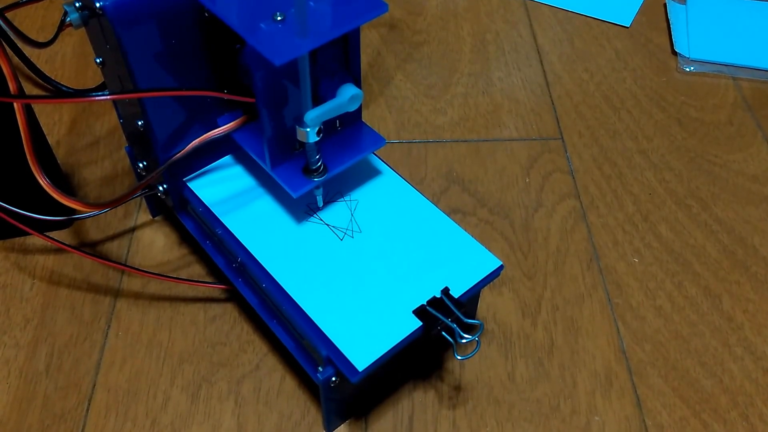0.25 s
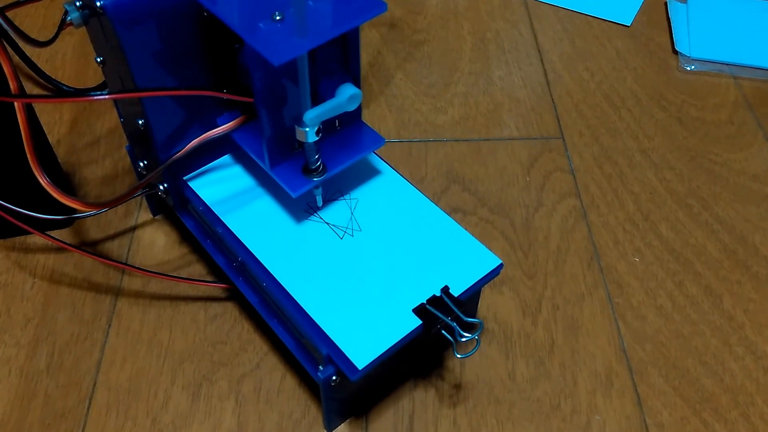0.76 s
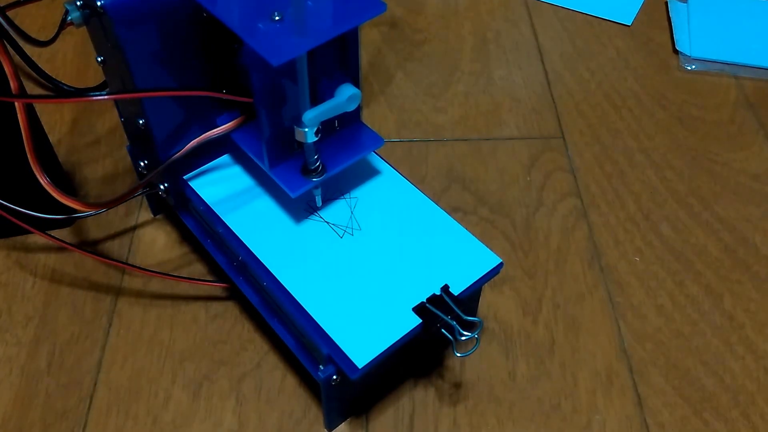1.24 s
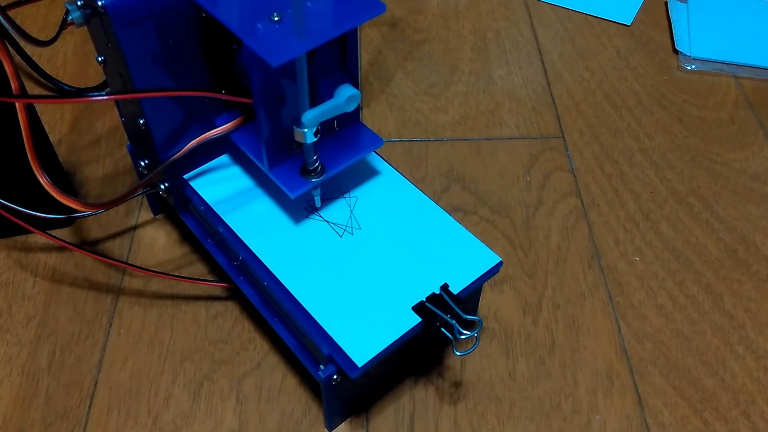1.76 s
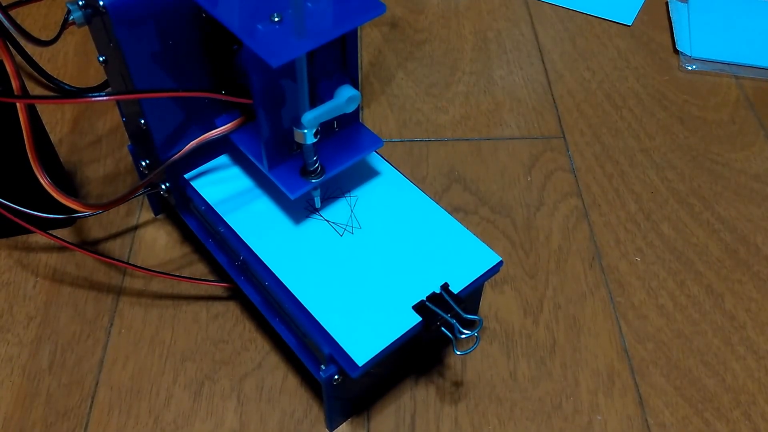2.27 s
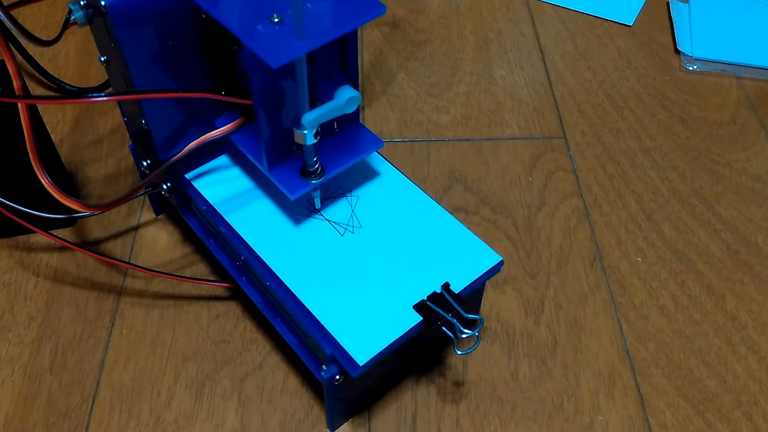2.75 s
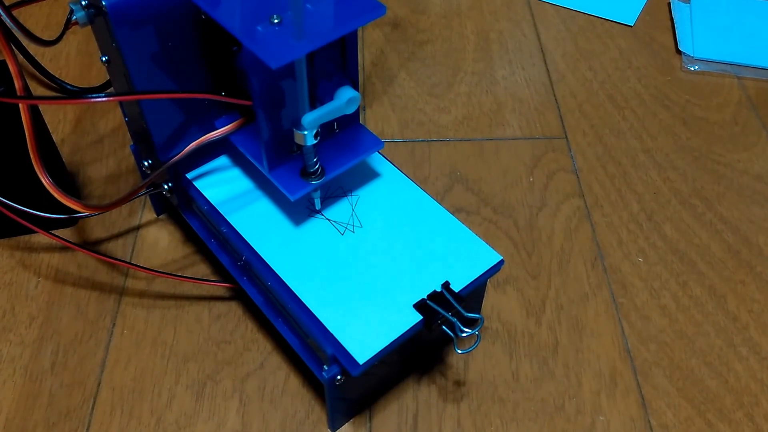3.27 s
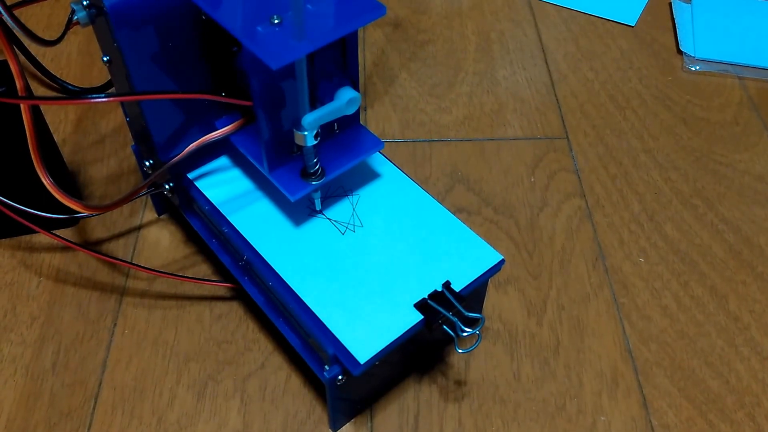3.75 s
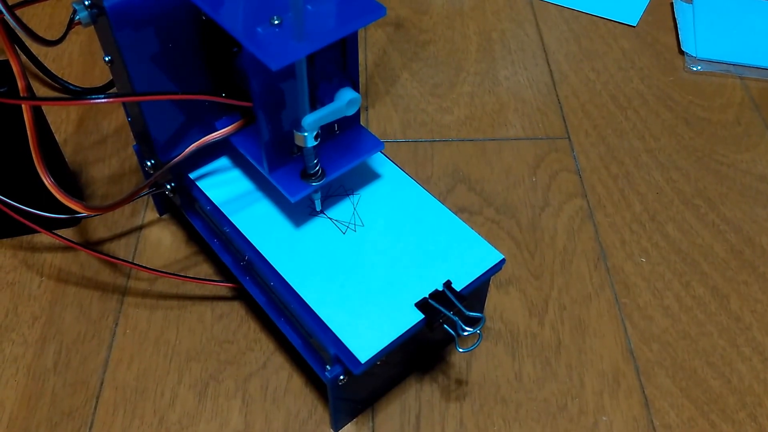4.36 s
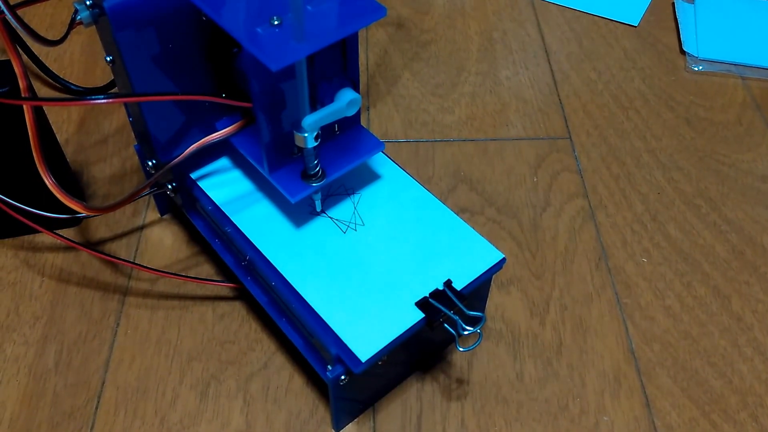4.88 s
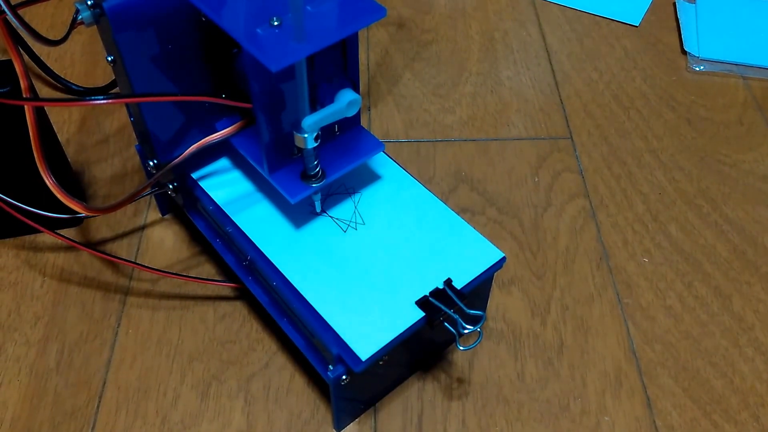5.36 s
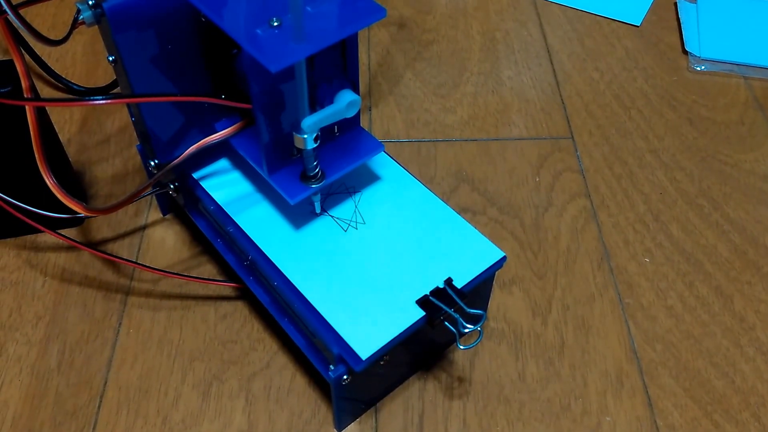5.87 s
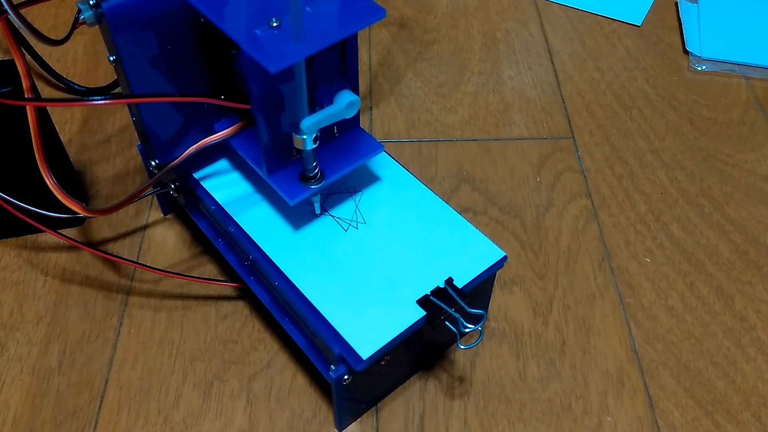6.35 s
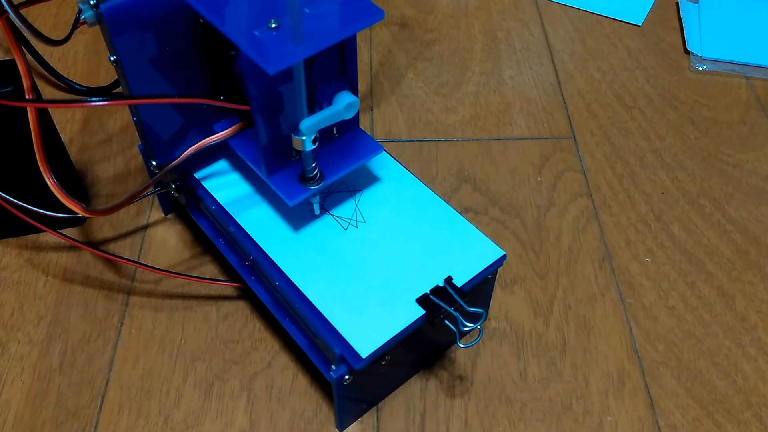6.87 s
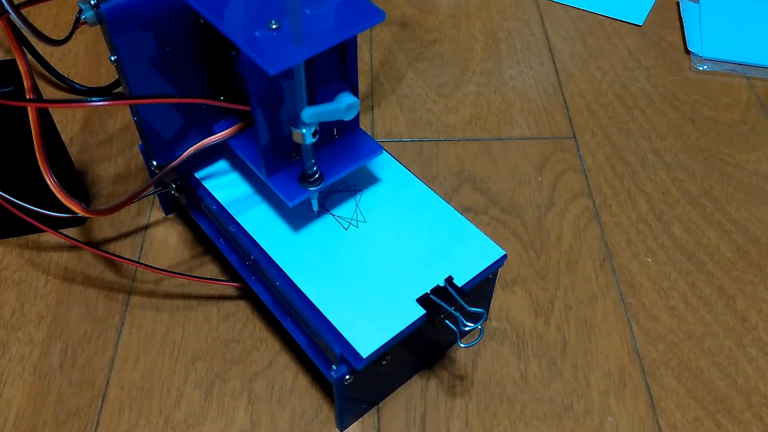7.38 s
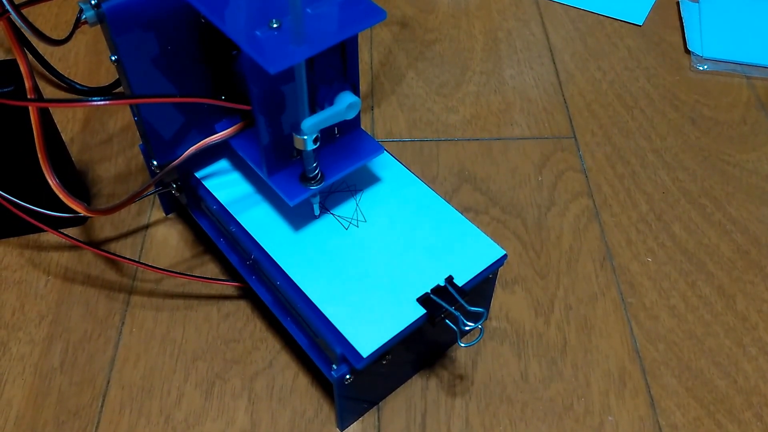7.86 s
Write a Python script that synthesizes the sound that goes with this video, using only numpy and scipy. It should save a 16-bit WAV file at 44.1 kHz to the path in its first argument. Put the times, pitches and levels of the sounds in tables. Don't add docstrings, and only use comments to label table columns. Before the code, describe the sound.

Close up, a tiny servo chatters thinly and continuously while slides tick irregularly, then two brief gritty gear zips burst out after seven seconds.

```python
import sys
import numpy as np
from scipy import signal
from scipy.io import wavfile

SR = 44100
rng = np.random.default_rng(int(sys.argv[2]) if len(sys.argv) > 2 else 0)


def generate_wav(signal):
    frames = np.transpose(np.atleast_2d(signal))
    scaled = np.clip(frames, -1, 1) * 32767
    pcm = np.round(scaled).astype(np.int16)
    wavfile.write(sys.argv[1], SR, pcm)


def boost(x):
    u = np.asarray(x, float) / 20
    return 10 ** u


N = 358091

# time in seconds, level in dB.
SERVO_EFFORT = [(0.0, -60.5), (0.6, -62.5), (1.83, -60), (2.28, -62.5), (2.58, -65.5), (2.89, -63),
                (3.3, -65.5), (3.84, -64), (4.21, -65.5), (4.7, -65.5), (5.0, -65), (5.47, -65),
                (6.4, -64.5), (7.2, -65.5), (7.45, -76), (7.6, -58), (7.72, -66), (7.92, -57)]
# frequency in Hz, left minus right in dB.
GEAR_BALANCE = [(60, 3.5), (110, 3.0), (200, 3.5), (380, 2.5), (700, 1), (1280, 11), (2370, 1.5),
                (4370, -3), (8070, 8), (14900, 18.5)]

OPPOSITE = np.array([[1], [-1]])


def pan(left_minus_right_db):
    return boost(left_minus_right_db / 2 * OPPOSITE)


def at_hz(points, hz):
    table_hz, table_db = np.transpose(points)
    return np.interp(np.log(hz), np.log(table_hz), table_db)


def in_time(rows, outside=None):
    s, *columns = np.transpose(rows)
    return [np.interp(np.arange(N) / SR, s, c, outside, outside) for c in columns]


def rms_one(x):
    return x / np.sqrt(np.mean(x ** 2) + 1e-20)


def drift(rate):
    r = np.exp(-80 * np.pi * rate / SR)
    noise = rng.standard_normal(N // 40 + 2002)
    slow = signal.lfilter([1], [1, -2 * r, r * r], noise)[2000:]
    return np.interp(np.arange(N) / 40, np.arange(len(slow)), rms_one(slow))


def train(times, sizes):
    out = np.full(N, 1e-18)
    at = np.round(np.asarray(times) * SR).astype(int)
    np.add.at(out, np.clip(at, 0, N - 1), sizes)
    return out


def ring(clicks, hz, t60):
    r, w = boost(-60 / (t60 * SR)), 2 * np.pi * hz / SR
    return signal.lfilter([0, np.sin(w)], [1, -2 * r * np.cos(w), r * r], clicks)


def swell(clicks, rise_s, t60):
    a, b = np.exp(-1 / (max(rise_s, 1e-4) * SR)), boost(-60 / (t60 * SR))
    return signal.lfilter([1 - a], np.convolve([1, -a], [1, -b]), clicks)


def grains(per_s, spread_db, alike):
    sizes = boost(spread_db * np.minimum(rng.exponential(1, (2, N)), 5))
    sizes = sizes * rng.choice([-1, 1], (2, N))
    shared, own = rms_one(sizes * (rng.random((2, N)) < per_s / SR))
    alike = np.clip(alike, 0, 1)
    return np.array([shared, alike * shared + np.sqrt(1 - alike ** 2) * own])


def bands(low, high, per_octave):
    edges = np.geomspace(low, high, round(np.log2(high / low) * per_octave) + 1)
    return [(np.sqrt(a * b), signal.butter(2, [a, b], "band", fs=SR, output="sos"))
            for a, b in zip(edges, edges[1:])]


def body(x, spectrum, balance, per_octave):
    out, power = 0, 0
    for hz, sos in bands(spectrum[0][0], 15500, per_octave):
        level_db = at_hz(spectrum, hz)
        gain = boost(level_db) * pan(at_hz(balance, hz))
        out = signal.sosfilt(sos, x) * gain - out
        power += hz / per_octave * boost(2 * level_db)
    return out / np.sqrt(4 * power / SR)


def banded_noise(spectrum, likeness, per_octave, band_db):
    # frequency in Hz, left minus right in dB.
    balance = [(60, 8), (110, 3), (200, 2), (380, 4), (700, 6.5), (1280, 3.5), (2370, 6.5), (4370, 2.5),
               (8070, 6), (14900, 8.5)]
    out, white = 0, rng.standard_normal((2, 2, N))
    for k, (hz, sos) in enumerate(bands(spectrum[0][0], spectrum[-1][0], per_octave)):
        mid, side = signal.sosfilt(sos, white[k % 2])
        alike = np.clip(at_hz(likeness, hz), -1, 1)
        gain = boost(at_hz(spectrum, hz) + band_db(hz)) * pan(at_hz(balance, hz))
        out = out + gain * (np.sqrt(1 + alike) * mid + np.sqrt(1 - alike) * side * OPPOSITE)
    return rms_one(out)


def servo_hunting():
    # frequency in Hz, level in dB, decay time t60 in seconds.
    case_modes = [(2724, 5.5, 0.011), (3438, -6, 0.027), (4524, 14, 0.0071), (4800, 9, 0.012),
                  (5720, -3, 0.011)]
    # frequency in Hz, density in dB per Hz.
    gear_spectrum = [(2940, -32), (5000, -1), (5260, -5), (5850, -9), (7090, -6.5), (7880, -1.5),
                     (10700, -1), (12100, -12), (13300, -13), (14300, -6.5), (14700, -23), (15000, -40)]
    # frequency in Hz, left minus right in dB.
    rattle_balance = [(3000, 15), (5500, -0.5), (7000, -4), (9500, 12.5), (12000, 15.5), (15000, -2)]
    # time in seconds, ping over rattle in dB.
    bearing = [(0.0, -11.5), (0.8, -12), (1.5, -5), (2.5, -3), (5.0, -2), (5.6, -4), (5.9, 0.5),
               (8.12, -3.5)]
    first_s, period_s = .0092, .0200018
    count = int(N / SR / period_s)
    chance = rng.standard_normal((count, 2 + 2 * len(case_modes)))
    at = first_s + period_s * np.arange(count) + 0.00086 * chance[:, 0]
    now = (at * SR).astype(int)
    rattle_db = in_time(SERVO_EFFORT)[0][now]
    ping_db = rattle_db + in_time(bearing)[0][now]
    wall_db = -0.5 + 2 * drift(3.2)[now]

    kicks = train(at - .0052, boost(rattle_db + 17 + 2.2 * chance[:, 1]))
    build = np.hanning(round(0.0083 * SR))
    kicks = signal.oaconvolve(kicks, build / build.sum())[:N]
    rattle = swell(kicks, rise_s=0.00053, t60=0.021) * grains(5000, 2.9, 0.043)

    case = 0
    for k, (hz, db, t60) in enumerate(case_modes):
        force_db = ping_db + db - 20.5 + 1.4 * chance[:, 1] + 3.38 * chance[:, 2 + k]
        if k == 0:
            force_db = force_db + wall_db
        blows = train(at + .0015 + .0004 * chance[:, -1 - k], boost(force_db))
        case = case + ring(ring(blows, hz, t60), 1.0114 * hz, t60)
    return body(rattle, gear_spectrum, rattle_balance, 4) + case


def sweep_whirr(start, run, first_db, last_db):
    spin_up_s, spin_up_db, run_down_db_per_s = 0.014, 34, 407
    down = 60 / run_down_db_per_s
    rows = [(start, first_db - spin_up_db), (start + spin_up_s, first_db),
            (start + run, last_db), (start + run + down, last_db - 58)]
    return boost(in_time(rows, outside=-150)[0])


def servo_sweeps():
    # start in seconds, run in seconds, whirr in dB on reaching speed, level in dB at the end.
    sweeps = [
        (7.268, 0.075, -33, -34.5),
        (7.464, 0.053, -29.5, -20.5),
    ]
    # time in seconds, peak in dB.
    hard_contacts = [(7.2705, -21), (7.2775, -11), (7.2837, -17.5), (7.297, -20), (7.3035, -27), (7.3114, -35),
                     (7.328, -19), (7.3444, -44), (7.388, -38), (7.4797, -15), (7.488, -17), (7.495, -17),
                     (7.508, -16), (7.5123, -12.5), (7.5204, -32), (7.5334, -16), (7.543, -19), (7.5534, -19),
                     (7.6104, -44), (7.6314, -47), (7.6515, -40), (7.671, -32.5), (7.7534, -30.5),
                     (7.852, -33), (7.876, -21.5), (7.912, -45), (7.9508, -42), (8.0102, -63)]
    # frequency in Hz, density in dB per Hz.
    whirr_spectrum = [(760, -54), (1300, -29), (2210, -18), (2530, -32), (2770, -5), (3300, -24),
                      (3400, 0.5), (3580, -5), (4170, -47), (4530, 5), (6750, -3.5), (10500, 3.5),
                      (12500, -11.5), (14100, -5), (15000, -35)]
    # frequency in Hz, width in Hz, level in dB.
    whirr_modes = [(2820, 82, -30), (3650, 150, -7), (4535, 50, 3.5), (4840, 35, 5), (5460, 220, -20),
                   (9100, 45, -1), (9000, 27, 12), (10900, 40, -6), (10700, 34, 6), (13600, 110, 0)]
    run = sum(sweep_whirr(*row) for row in sweeps)
    s, peak_db = np.transpose(hard_contacts)
    teeth = boost(-5.5) * run + swell(train(s, boost(peak_db - 5.0)), rise_s=0.0015, t60=0.009)
    teeth = teeth * grains(7000, 2.2, .7)
    start = round(sweeps[0][0] * SR)
    teeth = teeth[:, start:]
    out = body(teeth, whirr_spectrum, GEAR_BALANCE, 9)
    for hz, width, db in whirr_modes:
        r = np.exp(-np.pi * width / SR)
        zeros = np.array([1, 0, -1]) * (1 - r * r) / 2
        poles = [1, -2 * r * np.cos(2 * np.pi * hz / SR), r * r]
        mode = signal.lfilter(zeros, poles, teeth)
        out += mode * boost(db + 5.5) * pan(at_hz(GEAR_BALANCE, hz))
    return np.pad(out, ((0, 0), (start, 0)))


def slide_knocks():
    # time in seconds, peak in dB, body over peak in dB,
    # rattle decay time t60 in seconds.
    carriage = [(1.712, -33, -17, 0.077), (2.0981, -34, -12.5, 0.18), (2.6932, -38.5, -22, 0.1),
                (2.803, -33.5, -11.5, 0.14), (2.915, -25.5, -16.5, 0.099), (3.9458, -28.5, -15, 0.11),
                (4.1574, -35, -23, 0.19), (4.4295, -36, -22, 0.17), (4.5408, -31.5, -12.5, 0.21),
                (5.6473, -47, -4, 0.12), (6.4992, -29.5, -24, .064), (6.8821, -27, -16, .11)]
    bed = [
        (0.183, -36, -21, .062),
        (0.9592, -39.5, -27, 0.12),
        (1.3293, -35, -24, .11),
        (2.583, -41.5, -11, 0.22),
        (3.557, -30, -31, 0.082),
        (7.866, -35.5, -11.5, 0.23),
    ]
    pen_holder = [(0.2462, -37.5, -21, 0.07), (1.0094, -43.5, -17, 0.11), (1.4102, -49, -26, .09),
                  (1.437, -37.5, -24, .24), (1.842, -43, -18, .08), (3.2375, -41, -16, .17),
                  (3.3, -40, -14.5, .2), (5.05, -48, -37, 0.2), (5.25, -38.5, -24, 0.17),
                  (5.4142, -39.5, -13.5, 0.24), (5.9172, -45, -6, 0.12), (6.2944, -39, -38, 0.15),
                  (6.5137, -38.5, -13, 0.32)]
    # resonance in Hz, left minus right in dB.
    slide_bodies = [
        (1380, 0.5),
        (1900, -3),
        (2620, 2.5),
    ]
    # frequency in Hz, density in dB per Hz.
    slide_spectrum = [(1470, -56), (2500, -9), (3860, -18), (4490, -15), (5210, -18.5), (7750, -4),
                      (10300, 1.5), (11700, -2.5), (13400, -13), (14200, -13.5), (15000, -29)]
    bounce_s, bounce_db = 0.011, -18.5
    half_width = 1.29
    shake, hollow = np.zeros((2, 2, N))
    age = np.arange(round(.2 * SR)) / SR - .005
    after = np.maximum(age, 0)
    contacts = grains(6000, 2.2, .45)
    for rows, (hz, pan_db) in zip((carriage, bed, pen_holder), slide_bodies):
        bar = signal.butter(2, [hz / half_width, hz * half_width], "band", fs=SR, output="sos")
        mode = np.sin(2 * np.pi * hz * after) * (1 - np.exp(-after / 0.0003))
        for s, db, body_db, t60 in rows:
            i = round((s - .005) * SR)
            span = slice(i, i + len(age))
            run_up = boost(-14.5 + 3000 * age)
            burst = boost(-4.0 - 60 * after / 0.011)
            rebound = boost(bounce_db - 60 * np.abs(age - bounce_s) / 0.018)
            tail = boost(-7.5 - 60 * after / max(t60, .01))
            shape = np.where(age < 0, run_up, burst + rebound + tail)
            shake[:, span] += boost(db - 5.5) * pan(pan_db) * shape
            hollow[:, span] += signal.sosfilt(bar, boost(db + body_db + 9) * shape * contacts[:, span])
            hollow[:, span] += boost(db + body_db - 2 - 60 * after / 0.029) * mode
    knock = body(shake * contacts, slide_spectrum, GEAR_BALANCE, 4)
    return knock + hollow * boost([[3], [-1]])


def drive_hiss():
    # frequency in Hz, density in dB per Hz.
    hiss_spectrum = [(1500, -15), (2150, -15.5), (2700, -12), (3150, -2.5), (3700, -8.5), (4200, -9),
                     (4700, -8), (5300, -10), (6500, -17), (8000, -10), (10300, -3), (12000, -13),
                     (14000, -9), (15000, -30)]
    # frequency in Hz, left-right likeness from -1 to 1.
    hiss_likeness = [(1600, 0.44), (2200, 0.072), (3150, 0.63), (4200, 0.98), (4700, 0.092), (6500, 0.15),
                     (10000, 0.11)]
    effort_db = in_time(SERVO_EFFORT)[0]

    def flicker(hz):
        return .5 * (effort_db - effort_db.mean()) + 2.5 * drift(15)

    return boost(-61.5) * banded_noise(hiss_spectrum, hiss_likeness, 4.5, flicker)


def port_taps():
    # time in seconds, peak in dB.
    taps = [
        (2.038, -26.5),
        (2.928, -24),
    ]
    s, db = np.transpose(taps)
    step = np.cumsum(train(s, boost(db + 15.5)))
    creep = signal.lfilter([.015], [1, -.985], step)
    soft = signal.lfilter([.55], [1, -.45], step) + .3 * creep
    cavity = ring(train(s + 0.0009, boost(db - 8)), 3700, 0.007)
    contact = ring(train(s, boost(db - 23)), 1630, 0.001)
    return [[0], [1]] * (soft + cavity + contact)


def floor_thuds():
    # time in seconds, peak in dB, frequency in Hz.
    thuds = [
        (1.468, -56, 120),
        (3.963, -50, 76),
        (4.556, -51.5, 125),
        (4.935, -57.5, 79),
        (5.929, -50, 73.4),
        (6.527, -54.5, 67.3),
        (6.891, -51.5, 80.5),
        (7.3, -47.5, 85.5),
        (7.899, -51, 83.4),
    ]
    out = 0
    for s, db, hz in thuds:
        out = out + ring(train([s], boost(db + 7.5)), hz, 0.077)
        out = out + ring(train([s], boost(db + 9.5)), 2.39 * hz, 0.023)
    return signal.lfilter([.05], [1, -.95], out) * boost([[9], [6]]) * OPPOSITE


def motor_whine():
    # time in seconds, level in dB.
    motor_load = [(0.0, -84), (1.0, -90), (1.2, -71), (2.2, -79), (2.85, -72), (3.2, -78.5), (5.0, -76),
                  (6.4, -70), (7.3, -77.5), (7.6, -85), (8.12, -74)]
    # frequency in Hz, level in dB, decay time t60 in seconds.
    frame_modes = [(627, 0.5, 0.01), (954, 0.5, 0.013)]
    out, load_db = 0, in_time(motor_load)[0]
    for hz, db, t60 in frame_modes:
        wander_db = 1.5 * drift(2.5) + drift(8)
        mode = ring(ring(rng.standard_normal(N), hz, t60), hz, t60)
        out = out + boost(load_db + db + wander_db) * rms_one(mode)
    return out * boost([[6], [-1]]) * OPPOSITE


def room_hum():
    # frequency in Hz, density in dB per Hz.
    room_spectrum = [(24, -22), (40, -2), (82, 6), (443, -15), (660, -10), (825, -16), (967, -7),
                     (1350, -23), (1800, -9), (2340, -48), (3960, -120)]
    # frequency in Hz, left-right likeness from -1 to 1.
    room_likeness = [(60, -1.017), (290, -0.67), (640, -0.52), (1400, -0.12)]
    # time in seconds, level in dB.
    room_swell = [(0.0, -4.5), (1.6, -2), (2.2, 3), (2.6, -2.5), (4.4, -3.5), (5.7, 1), (7.3, 1),
                  (8.12, -3.5)]
    swelling = in_time(room_swell)[0]

    def lumps(hz):
        return (swelling - swelling.mean() + 4 * drift(5)) / (1 + (hz / 400) ** 2)

    return boost(-58.5) * banded_noise(room_spectrum, room_likeness, 2.5, lumps)


def scene():
    plotter = servo_hunting() + servo_sweeps() + slide_knocks() + drive_hiss()
    plotter[0] = np.roll(plotter[0], 22)
    return plotter + port_taps() + floor_thuds() + motor_whine() + room_hum()


def band_limit(x):
    return signal.sosfilt(signal.butter(12, 15490, fs=SR, output="sos"), x)


def record(dry):
    x = signal.sosfilt(signal.butter(6, 46, "high", fs=SR, output="sos"), dry)
    x = signal.sosfilt(signal.cheby2(12, 45, 14900, fs=SR, output="sos"), x)
    return band_limit(x)


dry = scene()
out = record(dry)
generate_wav(out)
```